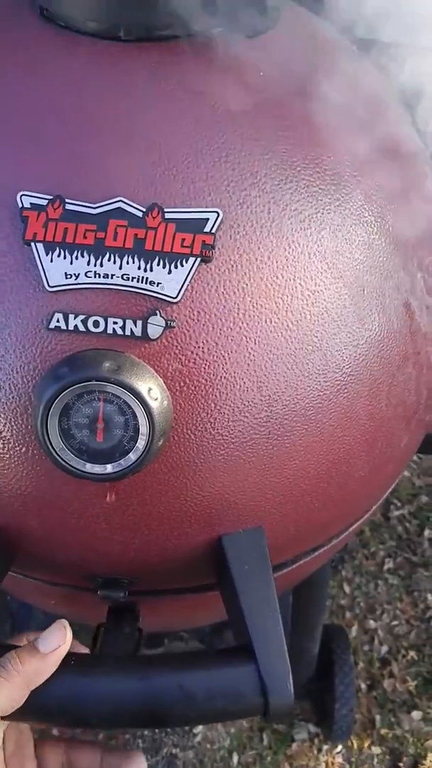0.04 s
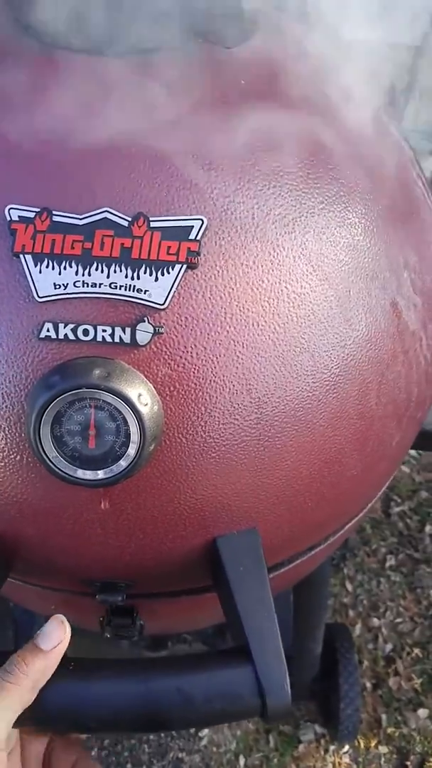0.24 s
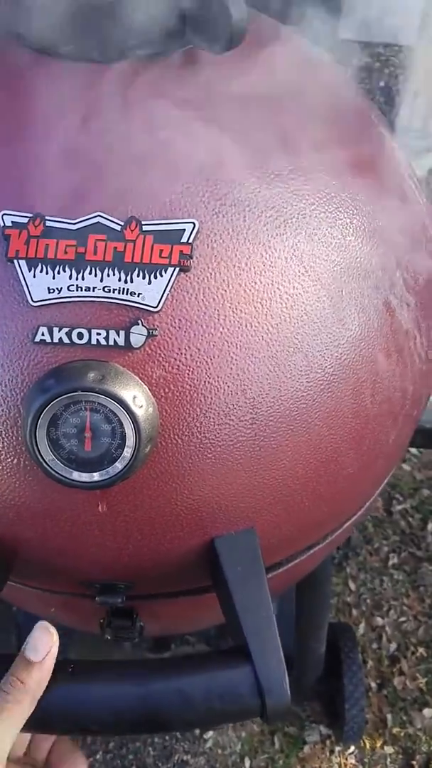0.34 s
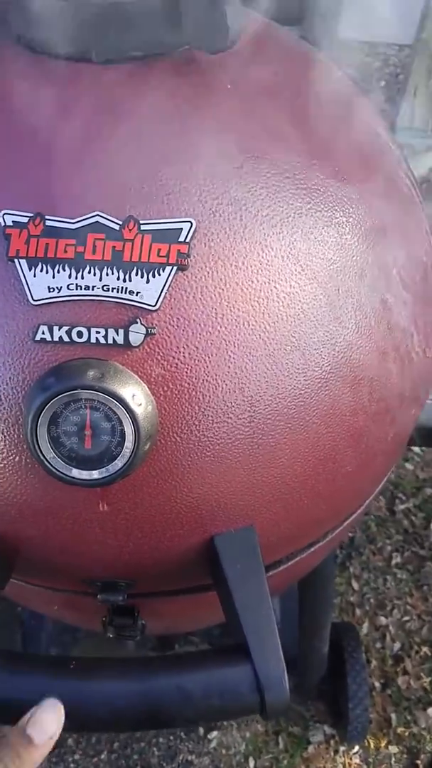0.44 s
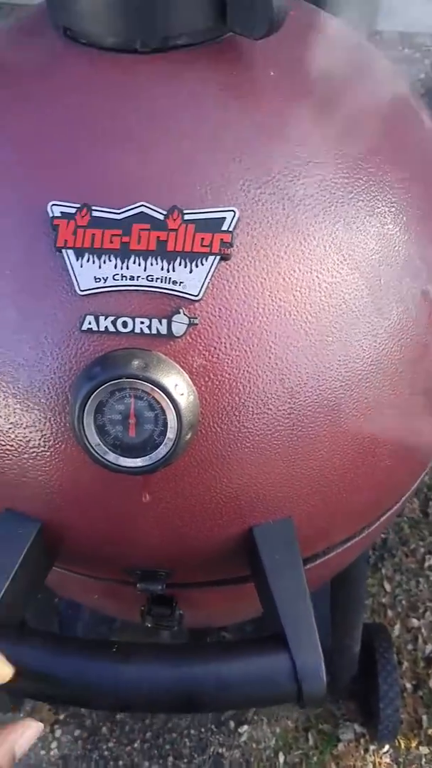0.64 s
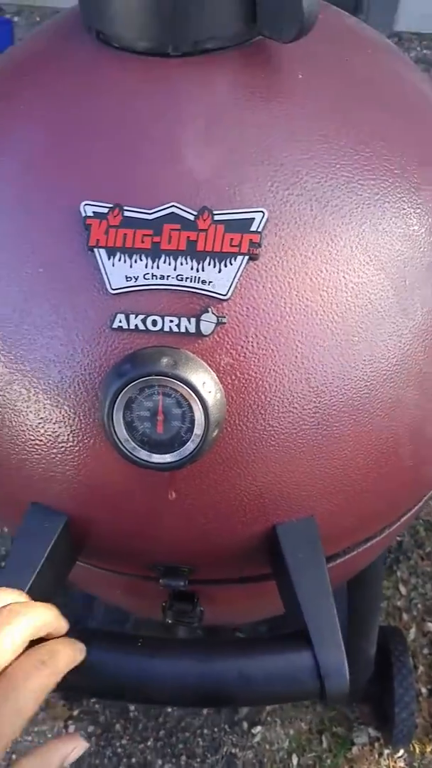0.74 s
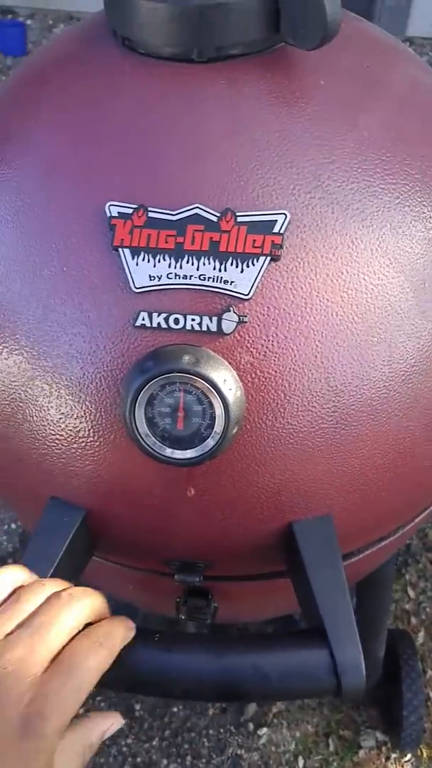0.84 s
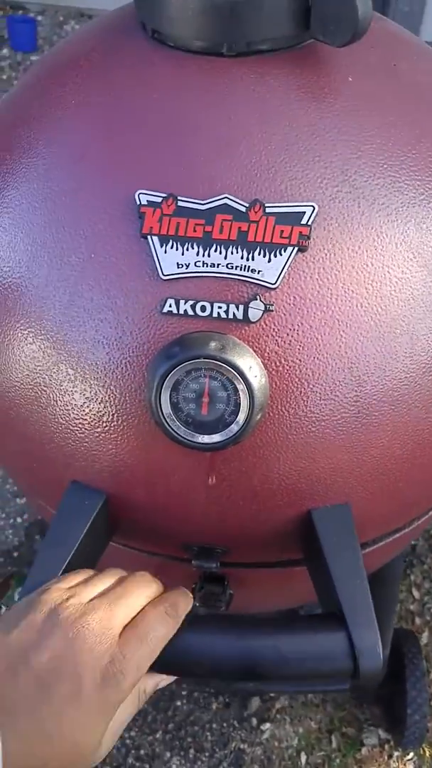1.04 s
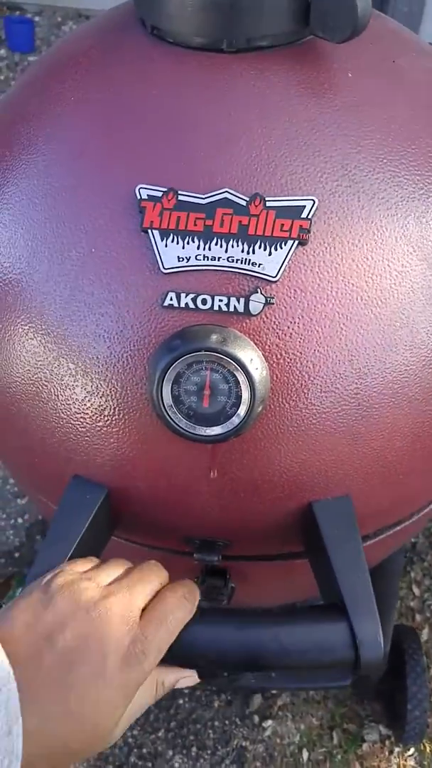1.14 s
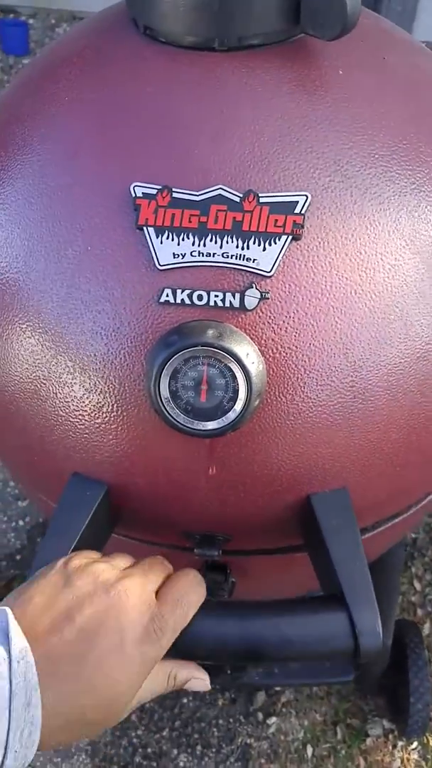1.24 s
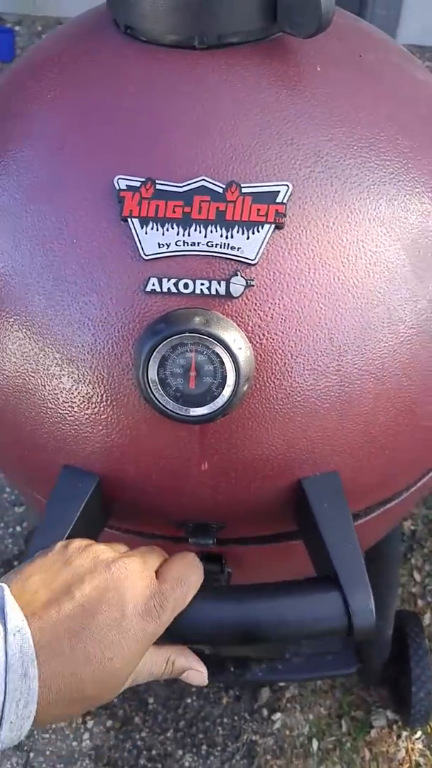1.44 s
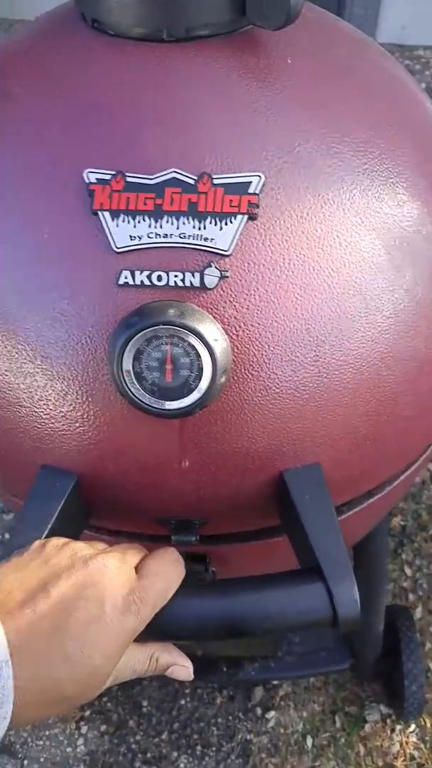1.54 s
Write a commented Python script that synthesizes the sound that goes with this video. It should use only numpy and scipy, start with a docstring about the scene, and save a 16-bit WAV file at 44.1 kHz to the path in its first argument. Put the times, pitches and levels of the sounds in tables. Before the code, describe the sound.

Close by in a yard, a grill latch snaps closed with a metallic bang that echoes briefly. A softer, hollow knock on the handle follows, then light bumps and sleeve rustle over faint outdoor rumble and hiss.

```python
"""A yard, close to a steel kettle grill. The latch snaps shut: three quick metal contacts crack and ring,
the lid booms on its gasket, the shell hums and the yard echoes. A hand then knocks dully on the hollow
handle and shifts its grip, with soft bumps, tiny ticks and a thin rustle of skin and sleeve.
A faint outdoor rumble and a high hiss run underneath."""
import sys
import numpy as np
from scipy import signal
from scipy.fft import rfft, irfft
from scipy.io import wavfile

SR = 44100
rng = np.random.default_rng(int(sys.argv[2]) if len(sys.argv) > 2 else 0)


def dump(signal):
    """Clip the signal to [-1, 1] and save it as 16-bit WAV at the path in sys.argv[1]."""
    limited = np.clip(np.atleast_2d(signal).T, -1, 1)
    pcm = np.round(limited * 32767).astype(np.int16)
    wavfile.write(sys.argv[1], SR, pcm)


N = 70560
T = np.arange(N) / SR
FREQS_HZ = np.arange(N // 2 + 1) * SR / N

# latch contacts: start_s, clang_db, crack_db
CONTACTS = [(0.2010, -7.5, -8), (0.2224, -17, -5), (0.2296, -25, -6)]
SNAP_S = CONTACTS[0][0]
# left-right correlation of latch noise and yard echo: freq_hz, correlation
SNAP_CORRELATION = [(200, 1), (600, 0.9), (1250, -0.1), (2400, 0.4), (4400, .1), (8000, -0.22),
                    (15000, -.1)]
# left-right correlation of all other noise: freq_hz, correlation
AIR_CORRELATION = [(60, 1), (400, 0.92), (1000, 0), (3000, .1), (9000, 0.06)]


def amp(db):
    """Decibels to gain."""
    return 10 ** (np.asarray(db) / 20)


def over_hz(points, hz):
    """Interpolate (freq_hz, value) points on a log-frequency axis."""
    freqs_hz, values = np.array(points, float).T
    return np.interp(np.log(np.maximum(hz, 1)), np.log(freqs_hz), values)


def over_time(points):
    """Gain curve from (time_s, level_db) points."""
    return amp(np.interp(T, *np.array(points, float).T))


def pan(left_db):
    """Stereo gains, left louder than right by left_db."""
    return amp(np.array([[left_db], [-left_db]]) / 2)


def fade(age_s, t60_s):
    """Exponential decay, silent before the start."""
    return (age_s >= 0) * np.exp(-np.log(1000) * np.maximum(age_s, 0) / t60_s)


def rise(age_s, tau_s):
    """Exponential approach from 0 to 1."""
    return 1 - np.exp(-np.maximum(age_s, 0) / tau_s)


def delay(x, delay_s):
    """Shift a stereo signal later."""
    return np.pad(x, ((0, 0), (int(delay_s * SR), 0)))[:, :N]


def noise(colour, correlation=AIR_CORRELATION):
    """Stereo noise, rms 1; colour is its relative spectral density."""
    likeness = np.clip(over_hz(correlation, FREQS_HZ), -.99, .99)
    mid, side = rfft(rng.standard_normal((2, N))) * np.sqrt([1 + likeness, 1 - likeness])
    low_cut = 1 / np.sqrt(1 + (colour[0][0] / np.maximum(FREQS_HZ, 1) / 2) ** 8)
    x = irfft(np.array([mid + side, mid - side]) * amp(over_hz(colour, FREQS_HZ)) * low_cut, N)
    return x / x.std()


def dense_modes(colour, decay, start_s):
    """Countless close modes: noise whose octaves each decay at their own rate."""
    spectrum = rfft(noise(colour, SNAP_CORRELATION))
    octave = np.log2(np.clip(FREQS_HZ, 128, 16384))
    out = 0
    for k in range(7, 15):
        band = irfft(spectrum * np.maximum(1 - abs(octave - k), 0), N)
        out += band * fade(T - start_s, over_hz(decay, 2 ** k))
    return out


def ring(modes, strikes, spread_rad=0, right_lag_s=0):
    """Damped modes fed by (start_s, level_db) strikes; left and right up to spread_rad apart."""
    age_s = T - strikes[0][0] - np.array([[0], [right_lag_s]])
    out = 0
    for (pitch_hz, level_db, t60_s), shift in zip(modes, rng.uniform(-0.93, 1, len(modes))):
        swing = sum(amp(force_db) * fade(T - start_s, t60_s) for start_s, force_db in strikes)
        phase_rad = np.array([[.5], [-.5]]) * spread_rad * shift * min(pitch_hz / 1200, 1)
        out += amp(level_db) * swing * np.sin(2 * np.pi * pitch_hz * age_s + phase_rad)
    return out


def outdoors():
    """Distant rumble and a steady high hiss."""
    # rumble spectrum: freq_hz, density_db
    rumble_colour = [(15, -48), (25, -65), (54, 4.5), (188, -3.5), (256, -7), (293, -2), (342, 1),
                     (557, -16.5), (636, -5.5), (887, -8.5), (1040, -13), (2010, -25.5), (3000, -27.5),
                     (3510, -35), (5000, -26.5), (6500, -41), (11000, -120)]
    # rumble envelope: time_s, level_db
    rumble_level = [(0, -47), (.6, -49.5), (1, -47.5), (1.6, -46)]
    # hiss spectrum: freq_hz, density_db
    hiss_colour = [(3000, -7.5), (5500, -13.5), (8200, -5.5), (10500, -3), (15500, -6.5)]
    return noise(rumble_colour) * over_time(rumble_level) + amp(-63.5) * noise(hiss_colour)


def rustle():
    """Skin and sleeve rub as the hand moves."""
    # rubbing spectrum: freq_hz, density_db
    colour = [(1000, -7.5), (3300, -22.5), (5500, -13), (6500, -10), (7250, -2.5), (7650, -8), (8100, -1),
              (8700, 1), (9400, -9.5), (13000, -18), (15500, -19)]
    # rubbing envelope: time_s, level_db
    level = [(0, -57), (.17, -51), (.36, -60.5), (.5, -56.5), (.77, -58), (.81, -44.5), (.86, -40.5),
             (.95, -48), (1.08, -50.5), (1.2, -53.5), (1.3, -51.5), (1.48, -53), (1.59, -46.5)]
    return noise(colour) * over_time(level)


def latch():
    """Each contact cracks and rings the latch; the first also sets the shell humming."""
    # lingering shell modes, lowest pair beating: pitch_hz, level_db, t60_s
    shell_modes = [(281.5, -33.5, .85), (289, -33.5, .85), (381, -32, .6), (657, -30, .8), (708, -19, .29),
                   (974, -27, .55), (1084, -17, .19), (1332, -23, .28), (1459, -24, .46), (1511, -19, .2),
                   (1583, -22, .2), (1852, -34, .5), (2126, -29, .3), (2702, -28, .25)]
    # bright latch modes: pitch_hz, level_db, t60_s
    latch_modes = [(1323, -17, .12), (1615, -13, .115), (1764, -22, .11), (1792, -21, .11),
                   (2179, -11, .115), (2276, -15, .1), (2320, -14, .1), (2358, -14, .11), (2560, -17, .13),
                   (2742, -14, .11), (3119, -12, .105), (3956, -14, .095), (4635, -18, .095),
                   (7547, -18, .085), (7649, -18, .085), (8073, -19, .085)]
    # dense ring of latch and shell: freq_hz, density_db
    clang_colour = [(120, -15), (270, 1), (520, -14.5), (800, -14.5), (1150, -3), (1850, -11), (2300, 0),
                    (3500, -18), (4400, -7), (5800, -17), (7700, -8.5), (10000, -14), (15500, -21)]
    # its decay: freq_hz, t60_s
    clang_decay = [(200, .08), (1000, 0.16), (2500, 0.12), (8000, 0.14), (15000, 0.057)]
    # contact crack: freq_hz, density_db
    crack_colour = [(1500, 6), (4300, 1), (5800, -3), (7700, 2.5), (15000, -7.5)]
    attack_s = 0.00067
    clang = dense_modes(clang_colour, clang_decay, start_s=0) * rise(T, attack_s)
    hum = ring(shell_modes, [(SNAP_S, -2.5)], spread_rad=4.2)
    chime = amp(3) * ring(latch_modes, [row[:2] for row in CONTACTS], spread_rad=2.3)
    out = (hum + chime) * rise(T - SNAP_S, attack_s)
    for start_s, clang_db, crack_db in CONTACTS:
        crack = noise(crack_colour, SNAP_CORRELATION) * fade(T, t60_s=0.028)
        out += delay(amp(clang_db) * clang + amp(crack_db) * crack, start_s)
    return out * pan(left_db=-1.3)


def lid_boom():
    """The lid bounces on its gasket: a few deep cycles that sag in pitch."""
    final_hz, sag_hz, sag_s, hold_s = 43.5, 109.5, 0.0079, 0.019
    age_s = np.maximum(T - SNAP_S, 0)
    cycles = final_hz * age_s + sag_hz * sag_s * rise(age_s, sag_s)
    swell = rise(age_s, tau_s=0.0021) * fade(np.maximum(age_s - hold_s, 0), t60_s=0.082)
    return -amp(-13.5) * swell * np.sin(2 * np.pi * cycles) * pan(left_db=11.5)


def yard_echo():
    """Diffuse echo of the snap; the lows last longest."""
    # echo spectrum: freq_hz, density_db
    colour = [(150, -26), (300, 1.5), (500, -9), (750, 0.5), (1500, 2.5), (2500, -0.5), (5000, -2.5),
              (9000, 3), (15000, -29.5)]
    # echo decay: freq_hz, t60_s
    decay = [(200, 1), (1000, 0.43), (3000, 0.34), (8000, 0.21), (15000, 0.11)]
    return amp(-20) * dense_modes(colour, decay, SNAP_S) * rise(T - SNAP_S, tau_s=0.048)


def ticks():
    """Tiny contacts of metal and fingers: short, bright noise bursts."""
    # ticks: start_s, level_db, peak_hz, t60_s
    touches = [(0.491, -52.5, 5080, 0.046), (0.8353, -30.5, 9200, 0.021), (1.296, -38.5, 9500, 0.018)]
    out = 0
    for start_s, level_db, hz, t60_s in touches:
        colour = [(hz / 4, -24), (hz * 0.62, -15), (hz, 0), (hz * 0.94, -10), (hz * 1.6, -19)]
        out += amp(level_db) * noise(colour) * fade(T - start_s, t60_s)
    return out


def handle_knock():
    """Fingers slap the hollow handle just before the palm knocks it; the soft hand leaves no treble."""
    # finger and palm strikes: start_s, body_db, slap_db
    knocks = [(0.8543, -19.5, -14.5), (0.8570, -1.5, -19.5)]
    # hollow handle modes: pitch_hz, level_db, t60_s
    modes = [(146, -24.5, 0.046), (265.6, -25.5, 0.17), (296, -19.5, 0.041), (373, -18.5, 0.057),
             (463, -24.5, 0.041), (675, -27.5, 0.12), (799, -17, 0.08), (889, -5, 0.039), (916, -18, 0.033),
             (1240, -24, 0.048), (1480, -23, 0.033), (2607, -24, 0.039), (2730, -23.5, 0.024),
             (3270, -28, 0.055)]
    # slap spectrum: freq_hz, density_db
    slap_colour = [(150, -7), (350, 12.5), (900, -1.5), (1500, -18), (2200, 3), (2800, -11), (3400, -5)]
    # echo spectrum: freq_hz, density_db
    echo_colour = [(200, -8.5), (900, -15), (1500, -26), (3200, -32)]
    low_hz, top_hz = 161, 3100
    out = 0
    for start_s, body_db, slap_db in knocks:
        slap = amp(slap_db) * noise(slap_colour) * fade(T - start_s, t60_s=0.038)
        echo = amp(body_db - 26.5) * noise(echo_colour) * fade(T - start_s, t60_s=0.16)
        body = ring(modes, [(start_s, body_db)], spread_rad=1.0, right_lag_s=0.00007)
        out += body + slap + echo
    out = signal.sosfilt(signal.butter(2, low_hz, "high", fs=SR, output="sos"), out)
    out = signal.sosfilt(signal.butter(14, top_hz, fs=SR, output="sos"), out)
    return out * pan(left_db=-2)


def grip():
    """Soft, quickly damped bumps as the grip settles."""
    # bumps: start_s, level_db, pitch_hz
    bumps = [(1.338, -26, 280), (1.3825, -33.5, 860), (1.386, -23.5, 226), (1.405, -28.5, 93),
             (1.479, -35.5, 158)]
    attack_s, t60_s = 0.0024, 0.036
    return sum(ring([(pitch_hz, 0, t60_s)], [(start_s, level_db)]) * rise(T - start_s, attack_s)
               for start_s, level_db, pitch_hz in bumps)


def scene():
    """Stereo sum of snap, hand and background."""
    snap = latch() + yard_echo() + lid_boom()
    hand = handle_knock() + grip() + (rustle() + ticks()) * pan(left_db=3.5)
    return snap + hand + outdoors()


def record(dry):
    """Round the loudest peaks, then cut the top."""
    ceiling, top_hz = 0.92, 15900
    rounded = dry / (1 + (dry / ceiling) ** 6) ** (1 / 6)
    return signal.sosfilt(signal.ellip(10, .2, 70, top_hz, fs=SR, output="sos"), rounded)


dry = scene()
out = record(dry)
dump(out)
```